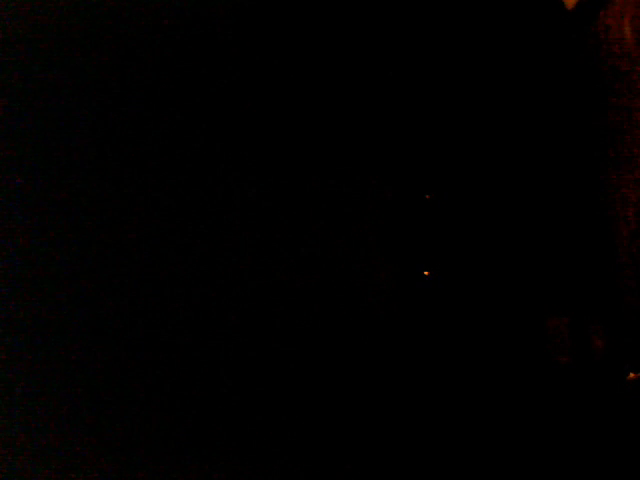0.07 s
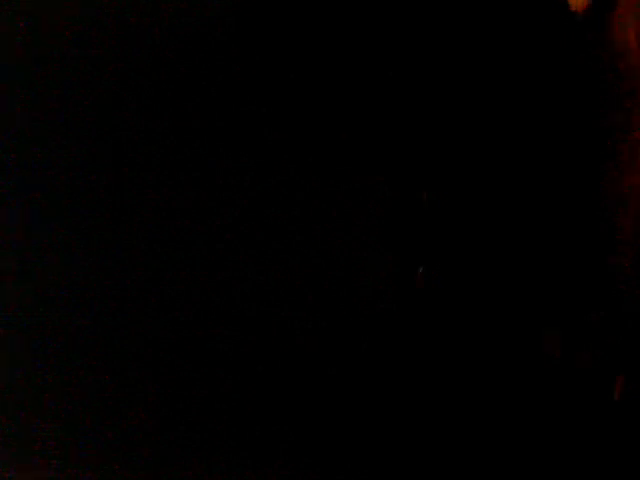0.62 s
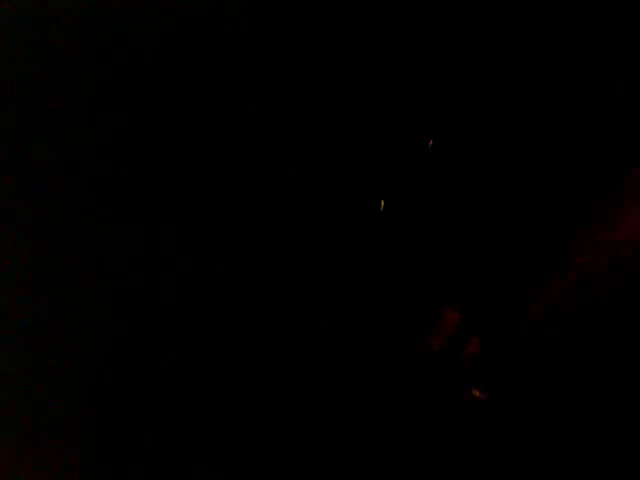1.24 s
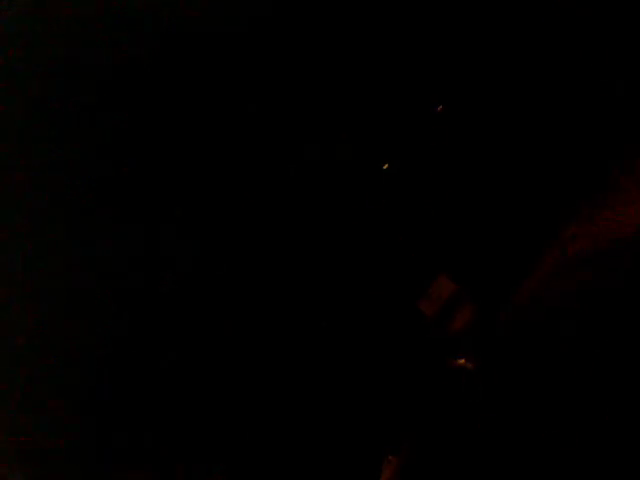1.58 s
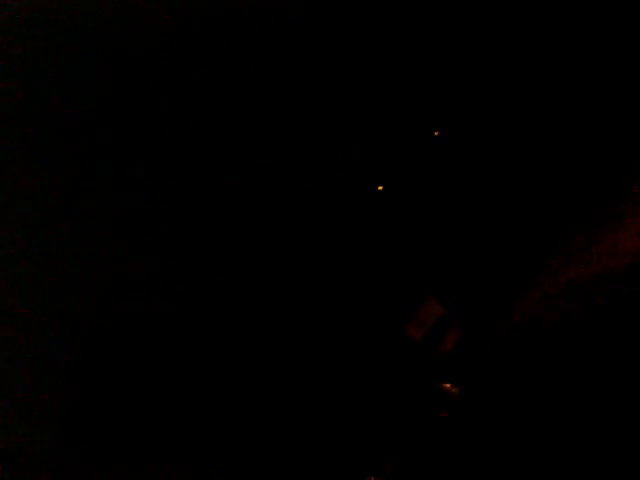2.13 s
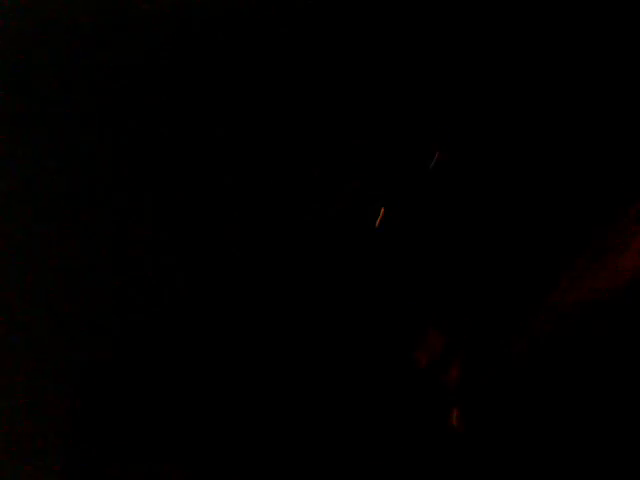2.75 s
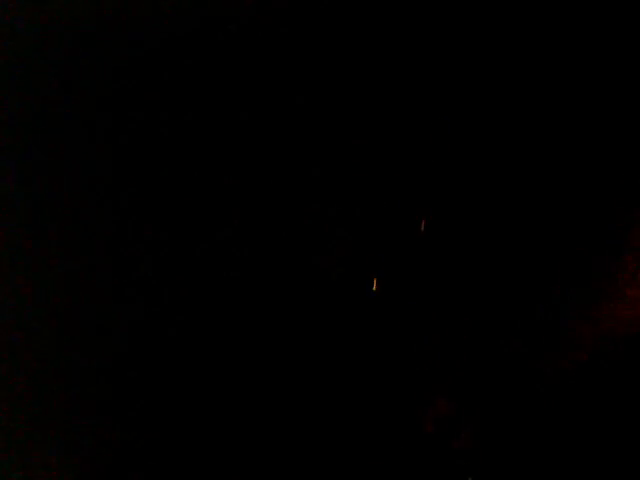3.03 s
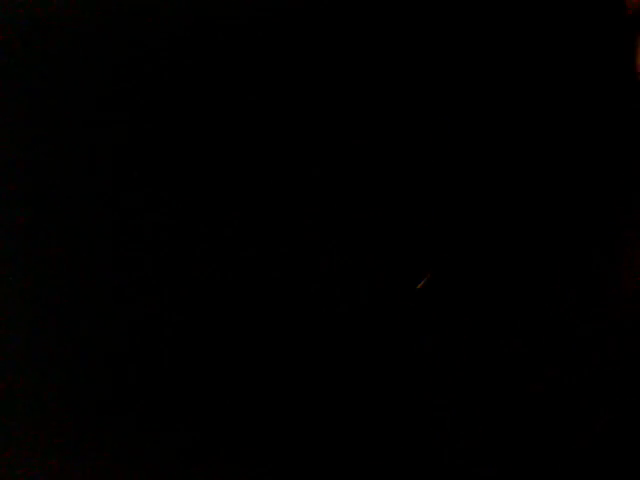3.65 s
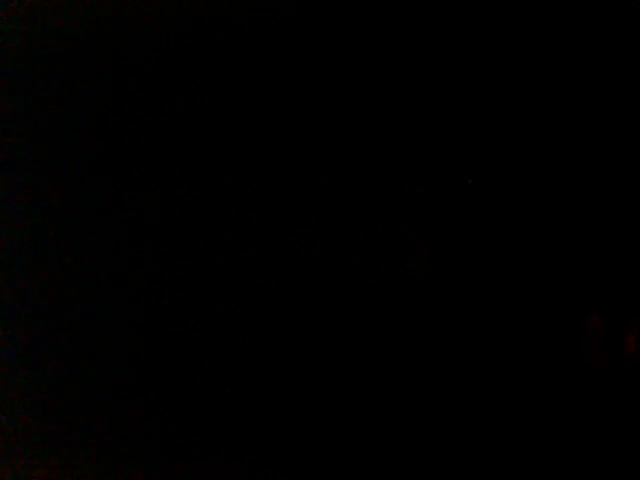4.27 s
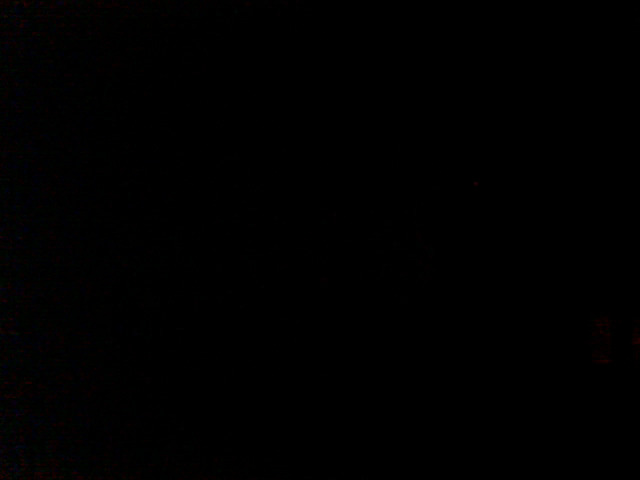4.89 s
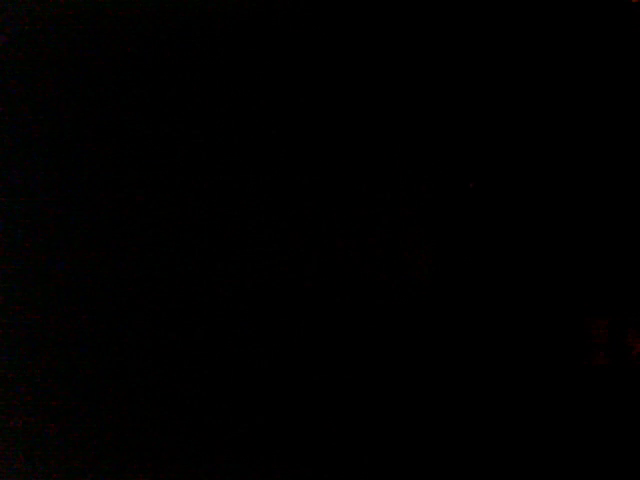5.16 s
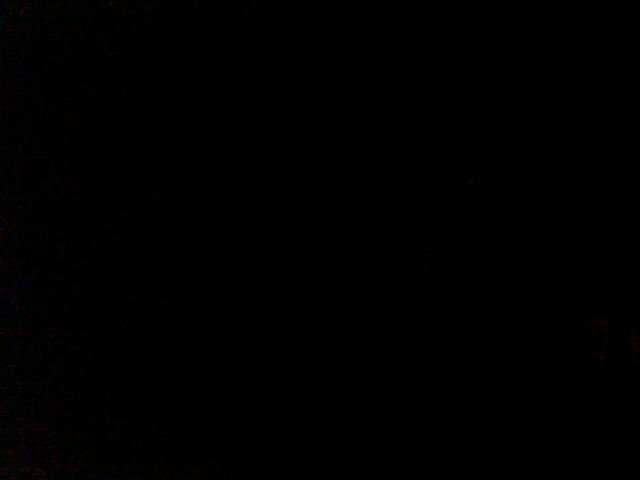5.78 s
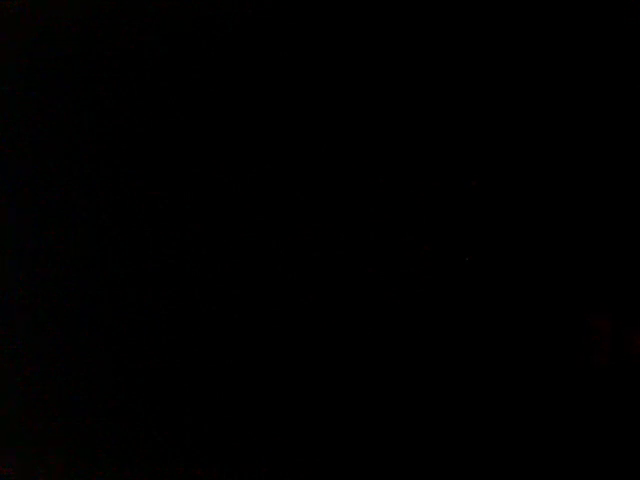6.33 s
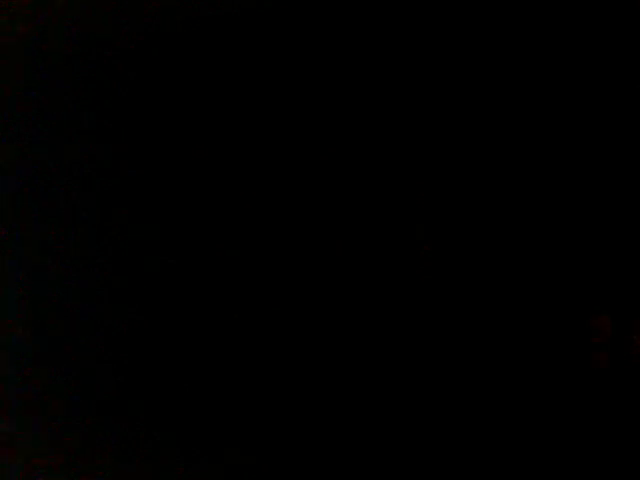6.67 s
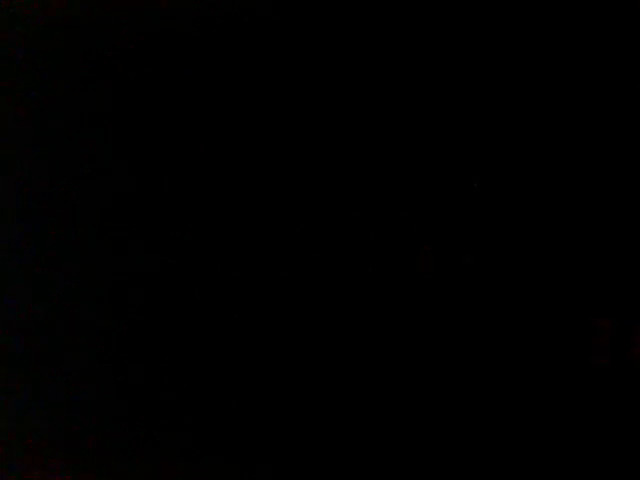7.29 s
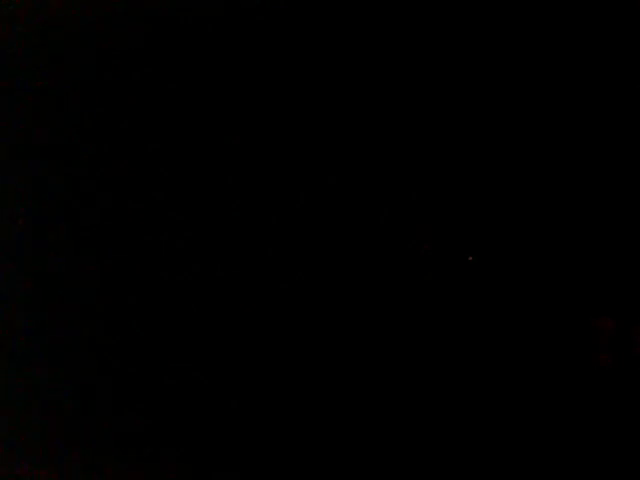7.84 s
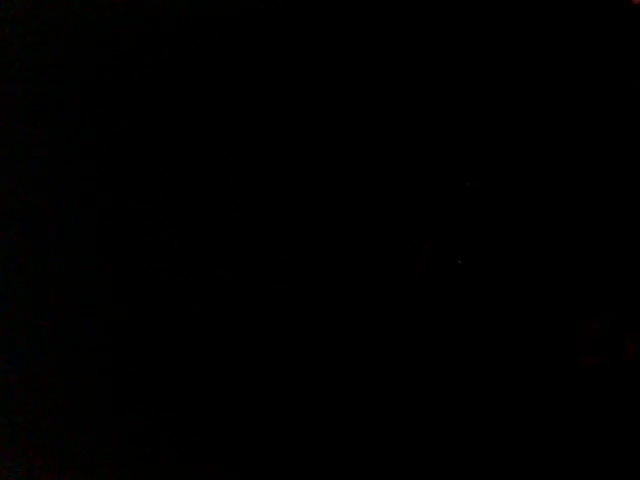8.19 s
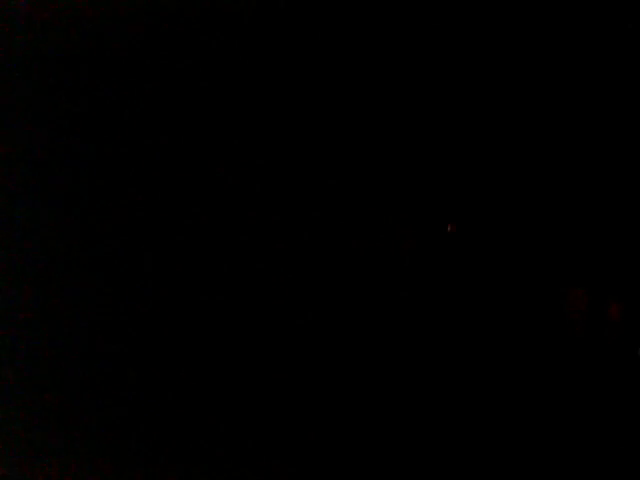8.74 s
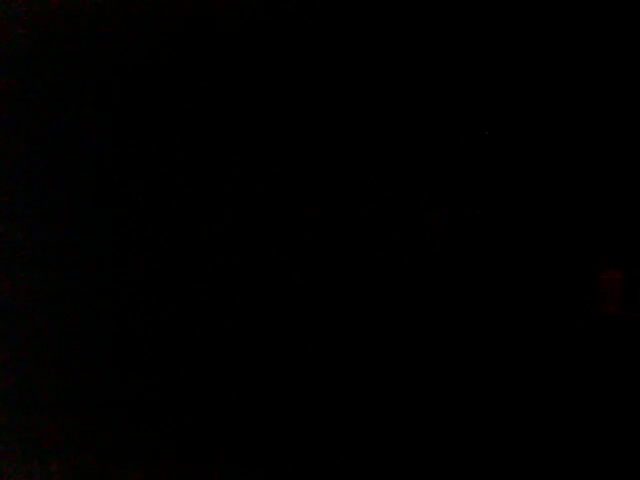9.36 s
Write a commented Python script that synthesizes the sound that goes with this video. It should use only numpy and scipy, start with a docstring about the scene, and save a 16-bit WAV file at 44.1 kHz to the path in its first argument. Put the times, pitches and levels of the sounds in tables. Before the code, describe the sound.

A close blackbird sings three short, warbling phrases with long pauses, echoing lightly off trees and houses. Between them come distant blackbirds, thin twitters, a quick trill, a tit's alternating low and high whistles and a faint crow. Sharp clicks and soft scrapes from handling the camera sound right at the microphone, mostly in the first half. A soft hiss and low rumble continue throughout.

```python
"""Birds sing in the dark, over a low rumble and a camera's hiss and faint whine. At first a far crow rasps,
a tit calls two notes and a blackbird flutes close by. Fingers knock on the camera, small birds twitter
and far blackbirds join in. Near 3.5 s a small bird trills and the close blackbird sings again. The tit
returns at 5.5 s, then the crow, and the blackbird ends on a burry call. Each whistle is air passing
through a bird's voice box, the syrinx; trees and houses throw every note back."""
import sys
import numpy as np
from scipy import signal
from scipy.fft import rfft
from scipy.io import wavfile
from scipy.ndimage import uniform_filter1d

SR = 44100
rng = np.random.default_rng(int(sys.argv[2]) if len(sys.argv) > 2 else 0)


def wav_record(signal):
    """Record a signal, one row per channel, as 16-bit PCM in the file named by sys.argv[1]."""
    frames = np.transpose(np.atleast_2d(signal))
    bounded = np.clip(frames, -1, 1)
    # unit amplitude maps onto the largest positive 16-bit level
    quanta = np.round(bounded * 32767).astype(np.int16)
    wavfile.write(sys.argv[1], SR, quanta)


N = 415422
TIME = np.arange(N) / SR


def amp(db):
    """Turns decibels into a number to multiply by."""
    return 10 ** (np.asarray(db) / 20)


def unit(x):
    """Scales a sound to an average strength (rms) of 1."""
    return x / np.sqrt(np.mean(x ** 2) + 1e-20)


def at_time(points, t):
    """Reads a curve at time t, joining its points with straight lines."""
    return np.interp(t, *np.transpose(points))


def at_hz(points, hz):
    """Reads a curve at a frequency, with the octaves evenly spaced."""
    f, value = np.transpose(points)
    return np.interp(np.log(hz + 1), np.log(f + 1), value)


def add(mix, s, sound):
    """Lays a sound into the mix, starting at s seconds."""
    start = round(s * SR)
    sound = sound[max(-start, 0):]
    part = mix[max(start, 0):][:len(sound)]
    part += sound[:len(part)]


def filtered(x, colour):
    """Turns each frequency up or down by a colour: a list of (Hz, dB) points."""
    hz = np.fft.rfftfreq(len(x), 1 / SR)
    return np.fft.irfft(rfft(x) * amp(at_hz(colour, hz)), len(x))


def coloured(x, colour):
    """Filters a sound, then scales it to a strength of 1."""
    return unit(filtered(x, colour))


def drift(t, rate):
    """A random wobble of strength about 1, moving up to rate times a second."""
    speed, phase = rng.random((2, 12, 1))
    return np.sin(2 * np.pi * (rate * speed * t + phase)).sum(0) / np.sqrt(6)


def swells(rows):
    """A loudness curve with one rounded burst for each row."""
    out = np.zeros(N)
    for s, length, db in rows:
        add(out, s, amp(db) * signal.windows.tukey(int(length * SR), .6))
    return out


def arc(u, start_hz, middle_hz, end_hz):
    """A smooth bend through three pitches as u goes from 0 to 1."""
    bulge = middle_hz - (start_hz + end_hz) / 2
    return start_hz + (end_hz - start_hz) * u + bulge * 4 * u * (1 - u)


def whistle(hz, gain, warble_hz=0, warble_rate=72, waver=0.0031, overtone_db=-47, unsteady=1.13,
            throb_db=5):
    """The syrinx: an almost pure tone. Shaking its pitch quickly makes its strength throb too."""
    t = np.arange(len(hz)) / SR
    shake = 2 * np.pi * (warble_rate * t + rng.random()) + unsteady * drift(t, 45)
    pitch = hz * (1 + waver * drift(t, 119.3)) + warble_hz * np.sin(shake)
    phase = 2 * np.pi * np.cumsum(pitch) / SR
    throb = amp(throb_db * np.tanh(abs(warble_hz) / 50) * (np.cos(shake) - 0.51))
    return np.sqrt(2) * gain * throb * (np.sin(phase) + amp(overtone_db) * np.sin(2 * phase))


def note(length, start_hz, middle_hz, end_hz, db, warble_hz=0, warble_rate=72, flutter_db=0,
         unsteady=1.21):
    """One whistle that bends through three pitches; its strength may flutter."""
    u = np.linspace(0, 1, int(length * SR))
    gain = amp(db + flutter_db * drift(u * length, 70)) * signal.windows.tukey(len(u), .35)
    return whistle(arc(u, start_hz, middle_hz, end_hz), gain, warble_hz, warble_rate, unsteady=unsteady)


# The colours of the deepest bass, the rumble and the hiss. Each row: frequency in Hz, level in dB.
SUB_COLOUR = [(10, -4.5), (30, -3.5), (60, -5), (110, -14.5), (250, -26), (600, -76.5)]
RUMBLE_COLOUR = [(60, -9.5), (120, -9), (250, -13.5), (500, -18.5), (1000, -24), (2000, -26), (4000, -47.5)]
HISS_COLOUR = [(300, -29), (1500, -6), (4000, 5), (7000, 0.5), (10000, 0), (15500, -4)]
# How the deepest bass and the rumble rise and fall. Each row: time in seconds, relative level in dB.
SUB_LEVEL = [(0.0, -74), (1.23, -64.5), (1.57, -73.5), (4.43, -71), (4.8, -62), (6.35, -74.5),
             (6.87, -63.5), (8.13, -73.5), (8.89, -67), (9.42, -73)]
RUMBLE_LEVEL = [(0.0, -69), (0.73, -67.5), (1.18, -58.5), (1.62, -68), (3.75, -66), (3.88, -58),
                (4.25, -70.5), (7.24, -67), (7.58, -69.5), (9.42, -67)]
# The tones of the whine. Each row: pitch in Hz, relative level in dB.
WHINE_TONES = [(10201, -78), (10261, -89), (13566, -97), (13824, -100)]


def background(sub_gain_db=5, rumble_gain_db=2.0, whine_gain_db=5.5, hiss_db=-64.0, gust_db=2.0):
    """Deep bass from moving air and a low rumble; the microphone hisses and the electronics whine."""
    sub = coloured(rng.standard_normal(N), SUB_COLOUR)
    sub *= amp(sub_gain_db + at_time(SUB_LEVEL, TIME) + gust_db * drift(TIME, 3.0))
    rumble = coloured(rng.standard_normal(N), RUMBLE_COLOUR)
    rumble *= amp(rumble_gain_db + at_time(RUMBLE_LEVEL, TIME) + 2.2 * drift(TIME, 11))
    hiss = coloured(rng.standard_normal(N), HISS_COLOUR) * amp(hiss_db)
    whine = sum(np.sqrt(2) * amp(db) * np.sin(2 * np.pi * hz * TIME + 0.56 * drift(TIME, 9.4))
                for hz, db in WHINE_TONES)
    return sub + rumble + hiss + amp(whine_gain_db) * whine


# Song too far away to tell apart. Each row: time in seconds, level in dB.
CHORUS_LEVEL = [(0, -51.5), (.9, -52), (1.4, -78), (1.7, -69.5), (2.25, -66.5), (3.1, -63.5), (3.5, -53.5),
                (4.0, -54.5), (4.7, -59), (5.05, -63.5), (5.55, -56), (5.9, -61.5), (7.75, -64),
                (8.02, -74), (8.32, -66), (8.45, -55.5), (8.95, -56.5), (9.3, -53)]
# Its colour. Each row: frequency in Hz, level in dB.
CHORUS_COLOUR = [(1200, -35), (1550, -10.5), (1780, -3.5), (2050, 0), (2450, -4.5), (2750, -1.5),
                 (3500, -40)]


def chorus(count=320, haze_db=-10):
    """Far songs arrive mostly as echoes: overlapping glides smeared into a wavering band."""
    songs = np.zeros(N)
    for when, length, pitch, bend, slope in rng.random((count, 5)):
        hz, glide = 1700 + 750 * pitch, 600 * (slope - .5)
        song = note(0.0399 + .08 * length, hz + glide, hz + 300 * (bend - .5), hz - glide, db=0)
        add(songs, when * N / SR, song)
    blur = outdoors(songs, early_db=4.0, tail_db=5.0)
    blur /= np.sqrt(abs(uniform_filter1d(blur ** 2, size=SR // 6)) + 1e-3)  # evens out the loudness
    haze_colour = [(1200, -9.5), (1800, 1.0), (2500, -5.0), (3000, -7.0), (4500, -6.0), (6500, -48)]
    haze = amp(haze_db) * coloured(rng.standard_normal(N), haze_colour)
    return (coloured(blur, CHORUS_COLOUR) + haze) * amp(at_time(CHORUS_LEVEL, TIME))


# The crow's caws. Each row: start in seconds, length in seconds, level in dB.
CAWS = [(-.06, 0.23, -53), (.08, 0.39, -54), (6.505, 0.053, -52), (6.545, 0.11, -50), (6.63, 0.088, -50),
        (6.705, 0.09, -52.5), (6.795, 0.11, -50.5)]
# The colour its throat gives them. Each row: frequency in Hz, level in dB.
THROAT_COLOUR = [(500, -36), (1000, -18.5), (1450, -2), (1750, -2.5), (2400, -6), (2800, -13.5),
                 (3300, -27), (6000, -40)]


def crow(pulse_hz=190, jitter=0.1164):
    """Uneven pulses and puffs of breath pass through the throat and come out as a rasp."""
    cycles = np.cumsum(pulse_hz * (1 + jitter * drift(TIME, 90))) / SR
    pulses = unit(np.diff(np.floor(cycles), prepend=0))  # one click for each cycle
    puffs = unit(np.exp(-(cycles % 1) / 1.7) * rng.standard_normal(N))
    return coloured(pulses + puffs, THROAT_COLOUR) * swells(CAWS)


def tit_note(length, start_hz, end_hz, db, stress, flick_hz, flick_s=0.00193, flick_db=-11,
             flutter_db=2.1, second_after_s=0.0081, second_db=-7.0):
    """Opens with a steep flick from above, which a near surface throws back a moment later, and settles on a
    pure pitch whose strength flutters."""
    t = np.arange(int(length * SR)) / SR
    flick = np.exp(-t / flick_s)
    hz = start_hz + (end_hz - start_hz) * t / length + flick_hz * flick
    gain = amp(db + at_time(stress, t) + flick_db * flick + flutter_db * drift(t, 47.4))
    fades = signal.windows.tukey(len(t), .02) * np.minimum((length - t) / 0.013, 1)
    out = whistle(hz, gain * fades, waver=0.0032)
    second_flick = note(.006, start_hz + flick_hz, start_hz + flick_hz / 2, start_hz, db + second_db)
    add(out, second_after_s, second_flick)
    return out


# The tit's low notes. Each row: start in seconds, first and last pitch in Hz, level in dB,
# how much softer it opens in dB.
TIT_LOW = [(-.005, 3440, 3492, -51.5, 0), (.51, 3415, 3463, -51.5, 0), (5.498, 3130, 3446, -52.5, 13),
           (6.005, 3375, 3450, -48.5, 2), (6.517, 3419, 3473, -48, 3), (7.024, 3433, 3467, -48, 2.5),
           (7.552, 3370, 3465, -49.5, 2)]
# The high notes that answer them. Each row: last pitch in Hz, level in dB.
TIT_HIGH = [(4230, -46.5), (4122, -49.5), (4180, -48), (4250, -48.5), (4210, -47), (4136, -46.5)]
# How a low and a high note swell and dip. Each row: seconds into the note, change of level in dB.
LOW_STRESS = [(0, 10.5), (.017, 3), (.032, 4.5), (.065, 5.5), (.085, -5), (.108, 4.5), (.125, -3),
              (.142, 4), (.17, -7.5)]
HIGH_STRESS = [(0, -4), (.02, 1.5), (.05, 3.5), (.11, -3.5)]


def tit(low_s=0.1614, high_s=0.1085, high_after_s=0.2497, high_start_hz=4188, lag_s=.003,
        opening_s=0.022):
    """The tit whistles low and high notes in turn, and breaks off after the last low note."""
    out = np.zeros(N)
    for s, start, end, db, soft_db in TIT_LOW:
        low = tit_note(low_s, start, end, db, LOW_STRESS, flick_hz=600)
        opening = amp(-soft_db * np.exp(-TIME[:len(low)] / opening_s))
        add(out, s + lag_s, low * opening)
    for (s, *_), (end, db) in zip(TIT_LOW, TIT_HIGH):
        add(out, s + high_after_s, tit_note(high_s, high_start_hz, end, db, HIGH_STRESS, flick_hz=1400))
    return out


# The close blackbird's notes. Each row: start and length in seconds, first, middle and last pitch in Hz,
# closing drop in Hz, level in dB, where it is loudest from 0 to 1, swell in dB, warble depth in Hz.
BLACKBIRD_NOTES = [(0.094, 0.052, 1773, 1850, 1876, 0, -29.5, 0.42, 6, 0),
                   (0.143, 0.23, 1888, 1938, 1788, 150, -27.5, 0.64, 5.5, -1),
                   (0.385, 0.035, 2020, 2320, 2230, 4, -37.5, 0.4, 3, -6),
                   (0.409, 0.057, 2258, 2012, 1690, -1, -22, 0.2, 29, -23),
                   (0.501, 0.052, 2192, 2043, 1970, -2, -35.5, 0.8, 5, 50),
                   (0.546, 0.049, 1970, 1828, 1660, 11, -28.5, 0.26, 15.5, 3),
                   (0.653, 0.11, 2065, 2011, 2025, 2, -27, 0.9, 6, 19),
                   (0.746, 0.12, 2080, 2154, 2180, -7, -24, 0.23, 17.5, 52),
                   (3.621, 0.065, 2335, 2640, 2610, 5, -48, 0.3, 4, 33),
                   (3.665, 0.055, 2020, 1895, 1595, 3, -26.5, 0.45, 13.5, 3),
                   (3.82, 0.1, 1750, 1752, 1740, 2, -35.5, 0.45, 7, -2),
                   (3.9, 0.1, 1770, 1860, 1872, 212, -24, 0.55, 5, -8),
                   (4.071, 0.041, 2156, 2246, 2285, 0, -28.5, 0.86, 14.5, -2),
                   (4.119, 0.056, 2315, 2388, 2440, -3, -29, 0.4, 1.5, 3),
                   (4.16, 0.18, 2390, 2335, 2289, 0, -35.5, 0.9, 1.5, 3),
                   (4.165, 0.19, 2453, 2397, 2287, 150, -32.5, 1, 6.5, 4.5),
                   (9.228, 0.053, 2040, 1766, 1640, 1, -27, 0.18, 12, 50),
                   (9.294, 0.052, 1790, 1956, 1930, 4, -24, 0.68, 23.5, 12),
                   (9.346, 0.073, 1906, 1805, 1740, -2, -26, 0.26, 5.5, -3)]


def blackbird(attack_s=0.01, release_s=0.0057, drop_s=0.0081, flutter_db=1.5):
    """Fluted notes that swell and ease off; some end in a quick drop, some warble."""
    out = np.zeros(N)
    for s, length, start, middle, end, drop, db, loudest, swell_db, warble in BLACKBIRD_NOTES:
        t = np.arange(0, length, 1 / SR)
        hz = arc(t / length, start, middle, end) - drop * np.exp((t - length) / drop_s)
        effort_db = db + np.interp(t / length, [0, np.clip(loudest, .05, .95), 1],
                                   [-swell_db, 0, -swell_db])
        fades = np.minimum(t / attack_s, 1) * np.minimum((length - t) / release_s, 1)
        gain = fades * amp(effort_db + flutter_db * drift(t, 50.6))
        add(out, s, whistle(hz, gain, warble, warble_rate=60))
    return out


# Knocks on the camera. Each row: start in seconds, thump level in dB, contact time in milliseconds,
# tick level in dB, boost of the body's tones below 300 Hz in dB.
KNOCKS = [(.597, -41, 0.13, -68, -14), (0.9291, -30, 0.078, -35.5, -14), (0.932, -31, 0.15, -43, 11),
          (0.938, -37.5, 0.47, -64, 10.5), (1.0847, -26, 0.55, -38, 1.5), (1.1562, -27.5, 0.61, -40, -0.5),
          (1.2683, -26.5, 0.68, -36.5, 0), (1.308, -25.5, 0.49, -38, 3.5), (2.785, -40, 0.56, -69, -5),
          (2.989, -27, 0.04, -39.5, -10), (2.9996, -14, 0.14, -33.5, 1.5), (3.392, -31.5, 0.036, -53, -16),
          (3.675, -43, 0.039, -44.5, -10), (3.798, -35, 0.052, -48, -14), (4.036, -39.5, 0.31, -66, -13),
          (8.526, -39.5, 1.45, -67, -0.5), (8.969, -42.5, 2, -62, -11)]
# The tones the camera body rings with. Each row: pitch in Hz, level in dB, seconds to fade by 60 dB.
BODY_TONES = [(107, -11.5, 0.1), (214.6, -1.5, 0.088), (418, 8, 0.011), (507, 3.5, 0.012), (880, -6, 0.025),
              (1040, 3.5, 0.014), (1510, 17, 0.0029), (2680, -2, 0.01)]


def finger_knocks(tick_lead_s=0.0017, tick_s=0.0017, rattle_db=-22, rattle_s=0.055):
    """A dry tick, then the finger's push makes the camera body ring."""
    out, t = np.zeros(N), np.arange(SR // 5) / SR
    tick_colour = [(300, 0.5), (2000, -3.5), (4000, -4.0), (7000, -9.5), (10000, -15.0), (15000, -27.0)]
    for s, thump_db, contact_ms, tick_db, low_db in KNOCKS:
        ring = sum(amp(db + low_db * (hz < 300) - 60 * t / fade_s) * np.sin(2 * np.pi * hz * t)
                   for hz, db, fade_s in BODY_TONES)
        u = t / (contact_ms / 1000)
        push = u * (2 - u) * np.exp(-u)  # a longer contact gives a duller thump
        thump = signal.fftconvolve(ring, push)[:len(t)]
        add(out, s, amp(thump_db) * thump / abs(thump).max())
        tick = coloured(rng.standard_normal(len(t)), tick_colour)
        snap = 2 * t / tick_s * np.exp(1 - 2 * t / tick_s)
        rattle = amp(rattle_db) * np.exp(-t / rattle_s)
        add(out, s - tick_lead_s, amp(tick_db) * tick * (snap + rattle))
    return out


# Fingers sliding on the case. Each row: start and length in seconds, scrape and fizz levels in dB.
RUBS = [(0.696, 0.096, -54, -67), (0.923, 0.0155, -37.5, -58), (0.954, 0.077, -58.5, -64),
        (2.94, 0.13, -58.5, -60), (3.328, .14, -60.5, -68.5), (3.79, 0.03, -47.5, -62),
        (3.806, 0.062, -50, -68), (3.858, 0.26, -60, -77), (8.953, 0.22, -65, -73)]
# The colours of the scrape and the brighter fizz. Each row: frequency in Hz, level in dB.
SCRAPE_COLOUR = [(60, -21), (350, -9), (650, 0.5), (880, 10.5), (1100, 5.5), (1500, 2.5), (3000, -7),
                 (7000, -32), (15000, -47)]
FIZZ_COLOUR = [(1200, -25.5), (3000, -2), (7000, -2.5), (15000, -20)]


def finger_rubs(grains_per_s=1900):
    """Sliding skin crackles: many tiny clicks blend into a scrape and a fizz."""
    grains = rng.standard_normal(N) * amp(2.0 * np.minimum(rng.exponential(1, N), 3))
    grains *= rng.random(N) < grains_per_s / SR
    scrape = coloured(grains, SCRAPE_COLOUR) * swells([(s, length, db) for s, length, db, _ in RUBS])
    fizz = coloured(grains, FIZZ_COLOUR) * swells([(s, length, db) for s, length, _, db in RUBS])
    return scrape + fizz


# Small birds' buzzes. Each row: start and length in seconds, first and last pitch in Hz, level in dB,
# shake depth in Hz, shakes per second.
BUZZES = [(0.897, 0.035, 7130, 5170, -60, 200, 135), (0.922, 0.021, 4480, 3700, -43.5, 189, 160),
          (0.939, 0.05, 3470, 2360, -51, 174, 120), (.942, 0.031, 6500, 4810, -52, 330, 110),
          (0.967, 0.046, 4420, 3816, -43, 190, 132), (4.403, 0.11, 3050, 3020, -51, 171, 130),
          (4.418, 0.11, 5680, 5900, -68, 480, 180), (4.44, 0.082, 7200, 7300, -71, 520, 240),
          (4.585, 0.025, 5260, 5530, -60.5, 119, 150), (4.635, .025, 7300, 8100, -71, 415, 230),
          (4.706, 0.028, 8460, 6200, -62.5, 380, 180), (4.825, .025, 7000, 6940, -70, 300, 180),
          (4.637, 0.048, 4150, 4890, -48.5, 189, 151), (4.739, 0.057, 4540, 5020, -54, 170, 170),
          (4.835, 0.278, 4800, 4880, -55.5, 141, 120), (5.087, 0.051, 7750, 7500, -68, 280, 210),
          (5.18, 0.042, 3650, 4200, -53.5, 110, 150), (5.185, 0.065, 2450, 3410, -51.5, 220, 140),
          (5.226, 0.074, 3300, 2390, -50.5, 130, 130), (5.746, 0.038, 3800, 3680, -47.5, 200, 160),
          (7.578, 0.065, 3940, 3900, -53, 90, 79), (7.798, 0.076, 3880, 3900, -62, 110, 86)]


def buzzes():
    """Gliding whistles, shaken so fast and unevenly that they buzz."""
    out = np.zeros(N)
    for s, length, start, end, db, depth, rate in BUZZES:
        middle = (start + end) / 2
        add(out, s, note(length, start, middle, end, db, depth, rate, flutter_db=1.5, unsteady=2.45))
    return out


# Far blackbirds' notes. Each row: start and length in seconds, first and last pitch in Hz,
# level in dB, warble depth in Hz.
FAR_NOTES = [(1.521, 0.043, 1690, 1910, -60, 20), (1.604, 0.11, 2252, 2035, -62, 7),
             (1.678, 0.085, 2200, 2093, -60.5, 272), (1.738, 0.14, 1956, 1868, -63.5, 63),
             (1.84, .05, 2930, 2980, -71.5, 10), (1.924, 0.095, 1935, 2000, -70, 68),
             (1.892, 0.17, 3220, 3440, -71, 20), (2.092, 0.0484, 2380, 2090, -62, 4),
             (2.129, 0.072, 2066, 2055, -53.5, 11), (2.267, 0.15, 2595, 1833, -60, -5),
             (2.296, 0.25, 1782, 1700, -57.5, 28), (2.6, 0.23, 2384, 2300, -66, 60),
             (2.624, .17, 2605, 2630, -73, 50), (2.666, 0.11, 1946, 1990, -53, 95),
             (3.16, 0.17, 1787, 1804, -59.5, 8), (3.212, 0.16, 2000, 1980, -62, 13),
             (3.389, 0.16, 2110, 2360, -57, 8), (3.516, 0.098, 2282, 2183, -52, 8),
             (5.383, 0.096, 1447, 1900, -62, 20), (5.536, 0.072, 2086, 1948, -51, 40),
             (5.635, 0.063, 2250, 2450, -54, 38), (5.687, 0.13, 2270, 2040, -54.5, 25),
             (5.794, 0.0334, 2057, 1444, -58, 10), (5.987, 0.086, 1870, 1681, -54, 63),
             (6.09, 0.077, 1785, 1727, -56, 66), (6.313, 0.1, 2420, 2408, -60, 19),
             (6.431, 0.12, 2397, 2330, -53.5, 0), (7.45, 0.26, 2570, 2415, -68.5, 46),
             (8.07, 0.13, 2470, 2400, -68, 34), (8.219, 0.34, 2446, 2380, -65.5, 35),
             (8.138, 0.06, 1540, 1885, -64, 10), (8.234, 0.04, 1890, 1660, -61.5, 11),
             (8.466, .11, 2070, 1932, -56.5, 142), (8.664, .07, 1836, 1740, -54.5, 43),
             (8.756, 0.093, 2197, 2050, -54.5, 140), (8.861, 0.17, 2080, 2098, -53, 19),
             (8.98, .11, 2460, 2437, -58, 29)]


def far_blackbirds(sag=.6, warble_rate=55):
    """Glides that level out, some clear and some burry, fluttering on their way through the air."""
    out = np.zeros(N)
    for s, length, start, end, db, warble in FAR_NOTES:
        middle = start + sag * (end - start)
        add(out, s, note(length, start, middle, end, db, warble, warble_rate,
                         flutter_db=2.5, unsteady=1.796))
    return out


def pips(count=7, first_s=2.005, every_s=.114, pitch_hz=5080, fall_hz=130, length_s=0.05, level_db=-72):
    """A row of tiny, softly falling whistles before the trill."""
    out = np.zeros(N)
    for k, (late, high, loud) in enumerate(rng.standard_normal((count, 3))):
        hz = pitch_hz * (1 + 0.0061 * high)
        pip = note(length_s, hz + 2 * fall_hz, hz, hz - fall_hz / 2, level_db + 1.3 * loud)
        add(out, first_s + k * every_s + 0.007 * late, pip)
    return out


# Small birds' peeps. Each row: start and length in seconds, first, middle and last pitch in Hz,
# level in dB.
PEEPS = [(3.12, 0.014, 3550, 3600, 3750, -59.5), (3.293, 0.017, 3620, 3560, 3800, -55),
         (3.309, .014, 3960, 4140, 3950, -57), (4.436, 0.047, 4080, 3727, 3730, -42),
         (4.481, 0.032, 3770, 3870, 3760, -40), (4.792, 0.018, 4960, 5076, 5080, -44),
         (5.532, 0.026, 5120, 4990, 4890, -49), (5.653, 0.02, 3610, 3570, 3800, -45.5)]


def peeps():
    """Short, clear whistles that bend only a little."""
    out = np.zeros(N)
    for s, *shape in PEEPS:
        add(out, s, note(*shape))
    return out


# Small birds' slurs. Each row: start and length in seconds, first and last pitch in Hz, level in dB.
SLURS = [(3.196, .02, 6060, 5030, -67), (3.275, .016, 5740, 4900, -65), (3.414, .012, 5100, 4420, -61),
         (4.155, .045, 7480, 7300, -73), (5.053, 0.18, 8130, 7570, -63.5), (5.221, 0.056, 3335, 2570, -60),
         (5.277, 0.13, 7680, 7260, -63), (5.459, 0.081, 8150, 7170, -61.5), (5.522, 0.014, 6350, 4920, -53),
         (5.628, 0.015, 5700, 4500, -50), (5.647, 0.016, 4290, 3530, -46), (5.694, 0.014, 4490, 3480, -49),
         (7.487, 0.024, 4740, 3650, -61), (7.723, 0.023, 4700, 3830, -57)]


def slurs(sag=0.83):
    """Thin whistles that fall fast and level out."""
    out = np.zeros(N)
    for s, length, start, end, db in SLURS:
        add(out, s, note(length, start, start + sag * (end - start), end, db, flutter_db=2.5))
    return out


# The trill's syllables. Each row: time of the dip in seconds, how much earlier the flick comes in
# seconds, pitch of the dip in Hz, level in dB, how much louder the closing fall is in dB.
TRILL_SYLLABLES = [(3.457, 0.024, 3900, -51.5, -8), (3.559, 0.037, 3900, -53, -10),
                   (3.603, 0.022, 3490, -54, -6), (3.660, .022, 3450, -51, -9), (3.72, .023, 3470, -50, -8),
                   (3.781, .023, 3500, -50, -4), (3.840, .023, 3500, -53, 1), (3.905, .021, 3410, -51, -3),
                   (3.964, 0.019, 3440, -52, 0), (4.029, .021, 3470, -51.5, -5),
                   (4.092, 0.022, 3420, -51, 1), (4.187, .019, 3380, -53, 1)]


def trill(flick_s=0.0089, dip_s=0.021, close_s=0.0088, close_after_s=.011, flick_db=-4.5, vary=.022,
          scratch_hz=90, scratch_rate=310):
    """Each syllable is a steep upward flick, a dip and a short closing fall; no two are quite alike."""
    out = np.zeros(N)
    tunings = 1 + vary * rng.standard_normal((len(TRILL_SYLLABLES), 3))
    for (s, lead, dip_hz, db, close_db), (a, b, c) in zip(TRILL_SYLLABLES, tunings):
        flick = note(flick_s, 3550 * a, 4650 * a, 5200 * a, db + flick_db, scratch_hz, scratch_rate)
        dip = note(dip_s, 4850 * b, dip_hz, 4350 * b, db, scratch_hz / 2, scratch_rate, flutter_db=2)
        close = note(close_s, 4700 * c, 3950 * c, 3400 * c, db + close_db)
        add(out, s - lead - flick_s / 2, flick)
        add(out, s - dip_s / 2, dip)
        add(out, s + close_after_s, close)
    return out


# The louder double chips that end the trill. Each row: start in seconds, the hook's length in seconds,
# its top pitch in Hz before lift_hz is added, level in dB.
CHIPS = [(4.259, 0.022, 4296, -45.5), (4.338, 0.022, 4130, -43.5), (4.417, 0.012, 4060, -44.5),
         (4.497, 0.017, 4190, -47.5), (4.577, 0.0196, 4100, -43.5), (4.657, 0.022, 4010, -45),
         (4.741, 0.024, 3800, -49.5)]


def chips(fall_db=-4, hook_after_s=0.021, foot_hz=3500, lift_hz=90, peak_at=0.38):
    """Each double chip is a steep fall and then a hook: a whistle that shoots up and back down."""
    out = np.zeros(N)
    for s, length, top, db in CHIPS:
        add(out, s, note(length=0.0136, start_hz=4850, middle_hz=3775, end_hz=3530, db=db + fall_db))
        u = np.linspace(0, 1, int(length * SR))
        hz = np.interp(u, [0, peak_at, 1], [foot_hz, top, foot_hz]) + lift_hz
        add(out, s + hook_after_s, whistle(hz, amp(db) * signal.windows.tukey(len(u), .6)))
    return out


# Small birds' chirps. Each row: start and length in seconds, top pitch in Hz, level in dB.
CHIRPS = [(5.918, .07, 3870, -58.5), (6.051, 0.095, 4440, -52.5), (6.245, .115, 5040, -62.5),
          (8.544, 0.015, 4430, -56.5), (8.563, .011, 3970, -65), (8.645, 0.012, 4500, -57),
          (8.655, .011, 4050, -58.5), (8.745, 0.019, 4320, -57), (8.767, .014, 3750, -67)]


def chirps(foot_share=0.72, skew=0.66):
    """Arched whistles that rise quickly and fall back more slowly."""
    out = np.zeros(N)
    for s, length, top, db in CHIRPS:
        u = np.linspace(0, 1, int(length * SR))
        hz = arc(u ** skew, foot_share * top, top, foot_share * top)
        add(out, s, whistle(hz, amp(db) * signal.windows.tukey(len(u), .3)))
    return out


# The close blackbird's burry call. Each row: start and length in seconds, first, middle and last
# pitch in Hz, level in dB, warble depth in Hz.
BURR_NOTES = [(9.06, 0.098, 1640, 1820, 2300, -35.5, 59), (9.146, .1, 2150, 2200, 1830, -31.5, 130),
              (9.088, 0.17, 2080, 2600, 2200, -40, 79)]


def blackbird_burr(warble_rate=76, swell_db=6, stagger_db=2.0):
    """The two sides of the syrinx sound together: two shaken arches that swell unevenly."""
    out = np.zeros(N)
    for s, length, start, middle, end, db, depth in BURR_NOTES:
        voice = note(length, start, middle, end, db, depth, warble_rate)
        rise = np.minimum(np.linspace(-1, 1, len(voice)), 0)  # full strength from halfway on
        add(out, s, voice * amp(swell_db * rise + stagger_db * drift(TIME[:len(voice)], 89.7)))
    return out


# How long the echoes last. Each row: frequency in Hz, seconds to fade by 60 dB.
ECHO_FADE = [(500, 0.8), (2000, 1.255), (4000, 1.27), (8000, 0.77)]


def outdoors(x, early_db, tail_db, early_s=0.014):
    """Near walls scatter a few quick echoes; trees and houses add a long tail."""
    t = np.arange(SR * 3 // 2) / SR
    bounces = rng.choice([-1., 1.], len(t)) * (rng.random(len(t)) < 2000 / SR)
    bounces *= 1 - np.exp(-t / 0.022)  # the tail takes a moment to build
    hz, when, spectrum = signal.stft(bounces, SR, nperseg=256)
    fade = amp(-60 * when / at_hz(ECHO_FADE, hz)[:, None])
    tail = signal.istft(spectrum * fade, SR, nperseg=256)[1][:len(t)]
    early = rng.standard_normal(len(t)) * (rng.random(len(t)) < 300 / SR)
    early *= np.exp(-t / early_s) * (t > .006)
    echoes = amp(early_db) * early / np.linalg.norm(early) + amp(tail_db) * tail / np.linalg.norm(tail)
    return x + signal.fftconvolve(x, echoes)[:N]


def house_echo(x, delay_s, db):
    """A house front returns one late, scattered copy."""
    out = x.copy()
    add(out, delay_s, amp(db) * outdoors(x, early_db=-14.5, tail_db=-13.0))
    return out


# The band whose loudness the treble follows, and the treble that swells and sinks with it.
# Each row: frequency in Hz, weight in dB.
FOLLOWED_BAND = [(2300, -26.5), (3300, -3.5), (5000, 8), (8000, 15.5), (10000, -31)]
TREBLE_BAND = [(2300, -40), (3300, 0), (16000, 0)]


def treble_swell(x, quiet_db=-64, loud_db=-45, depth_db=9.0, window_s=0.023):
    """The high hiss swells with the birds' high notes and sinks between them."""
    power = uniform_filter1d(filtered(x, FOLLOWED_BAND) ** 2, size=int(window_s * SR))
    level_db = 10 * np.log10(abs(power) + 1e-12)
    gain = amp(np.interp(level_db, [quiet_db, loud_db], [-depth_db, 0]))
    return x + (gain - 1) * filtered(x, TREBLE_BAND)


def scene():
    """Mixes the birds, their echoes, the fingers and the background into one channel."""
    near = house_echo(blackbird() + blackbird_burr(), delay_s=0.12, db=-18)
    near = amp(-2.5) * outdoors(near, early_db=-9, tail_db=-13.0)
    far = outdoors(far_blackbirds(), early_db=-2.5, tail_db=-3.0)
    two_note = house_echo(tit(), delay_s=.19, db=-16)
    two_note = amp(1.0) * outdoors(two_note, early_db=-5.5, tail_db=-12.0)
    small = buzzes() + slurs() + chirps() + peeps() + amp(-0.7) * trill() + chips() + pips()
    small = outdoors(small, early_db=-7, tail_db=-11.0)
    caws = amp(-0.5) * outdoors(crow(), early_db=3.5, tail_db=-5.5)
    birds = near + far + two_note + small + caws + amp(2.0) * chorus()
    return (birds + finger_knocks() + finger_rubs() + background())[None]


def record(dry):
    """The treble sinks between the high notes, and the very highest treble is cut off."""
    cutoff_hz = 15850
    swelling = treble_swell(dry[0])[None]
    low_pass = signal.firwin(511, cutoff_hz, window=("kaiser", 8), fs=SR)
    return signal.oaconvolve(swelling, low_pass[None], "same")


dry = scene()
out = record(dry)
wav_record(out)
```